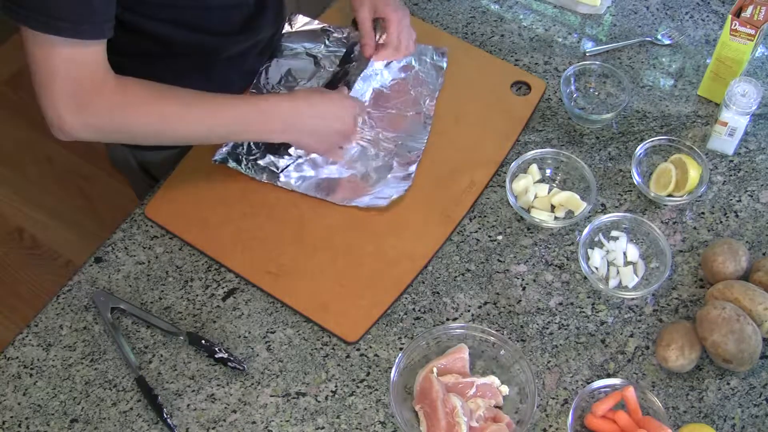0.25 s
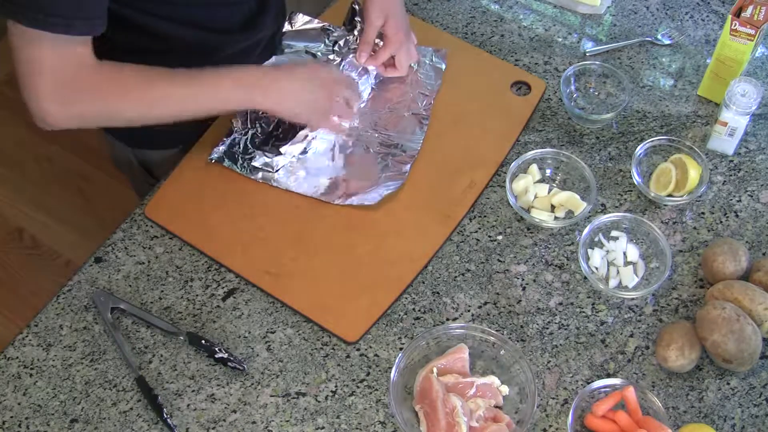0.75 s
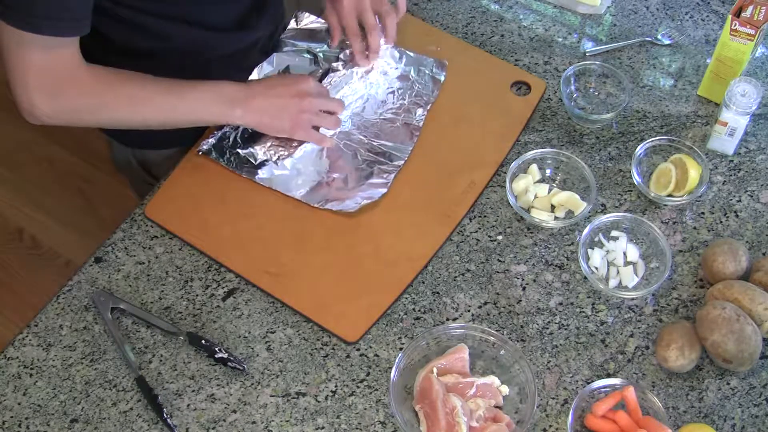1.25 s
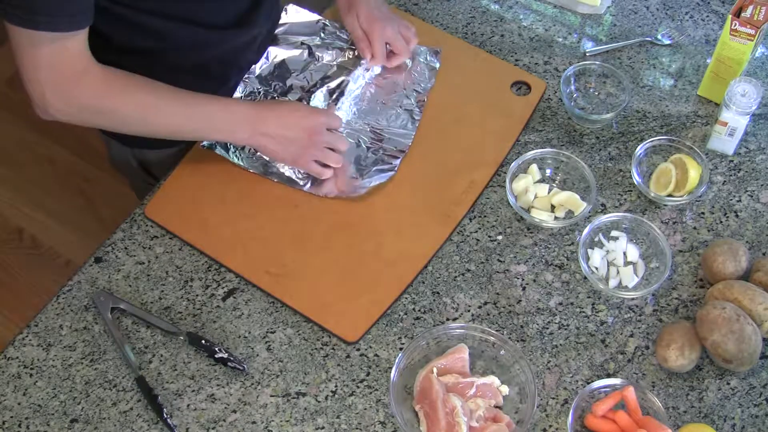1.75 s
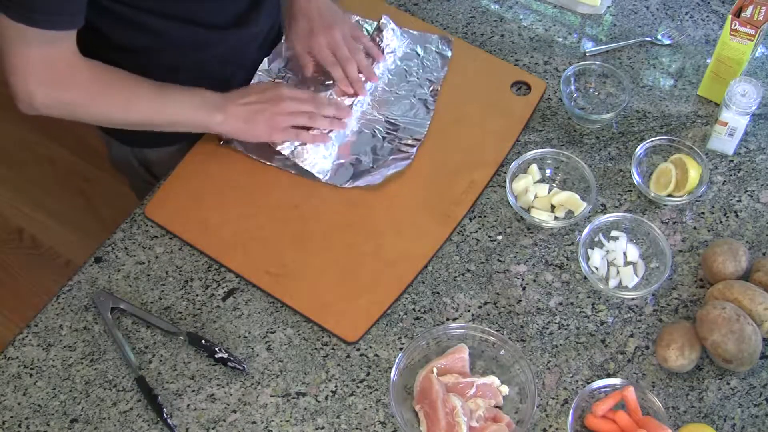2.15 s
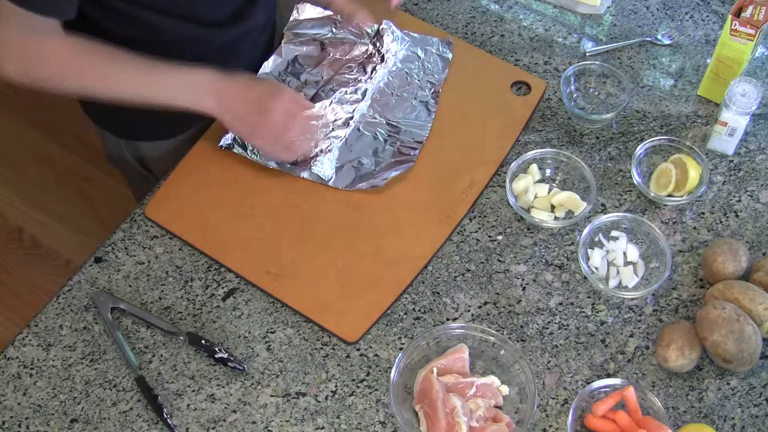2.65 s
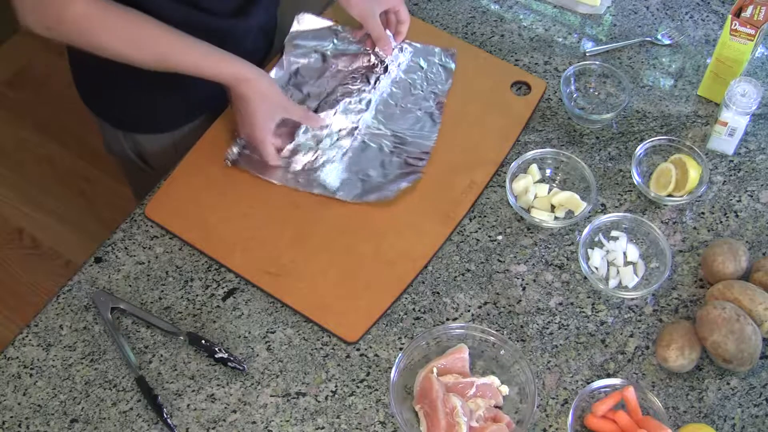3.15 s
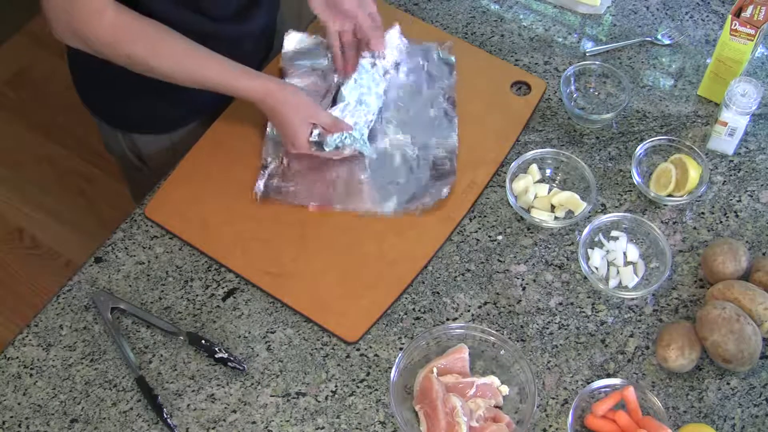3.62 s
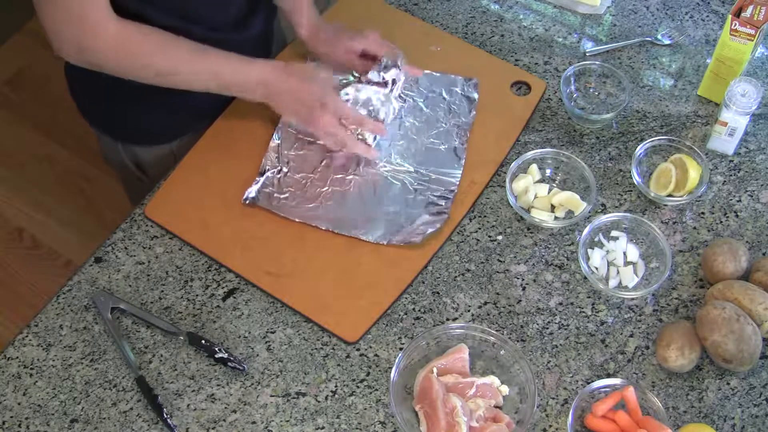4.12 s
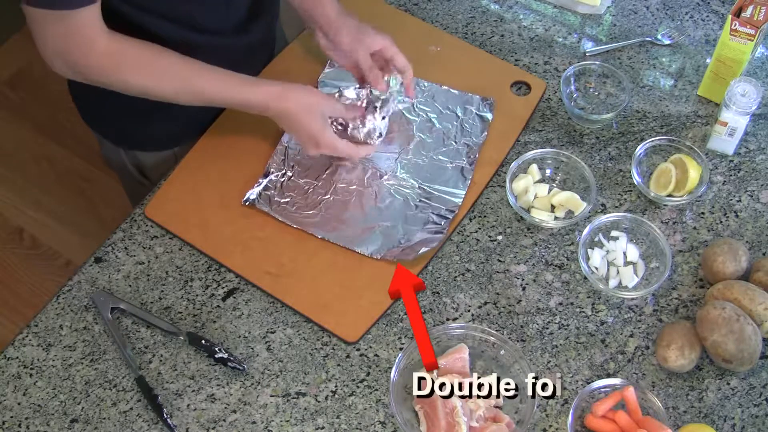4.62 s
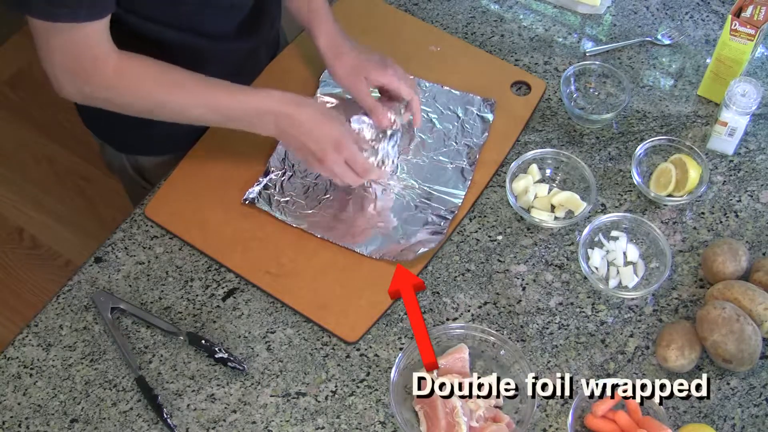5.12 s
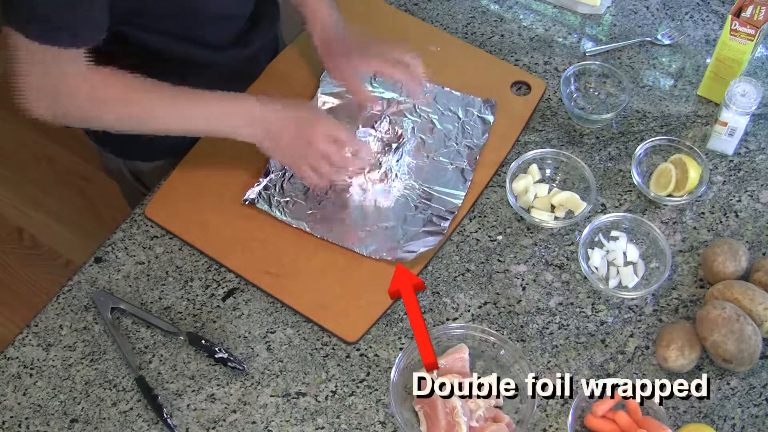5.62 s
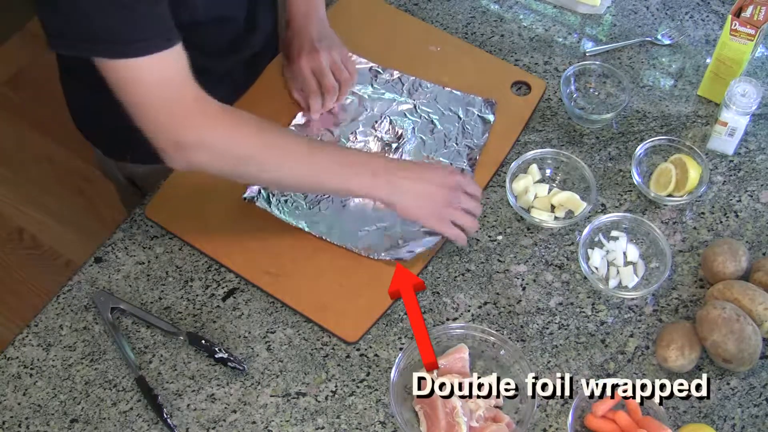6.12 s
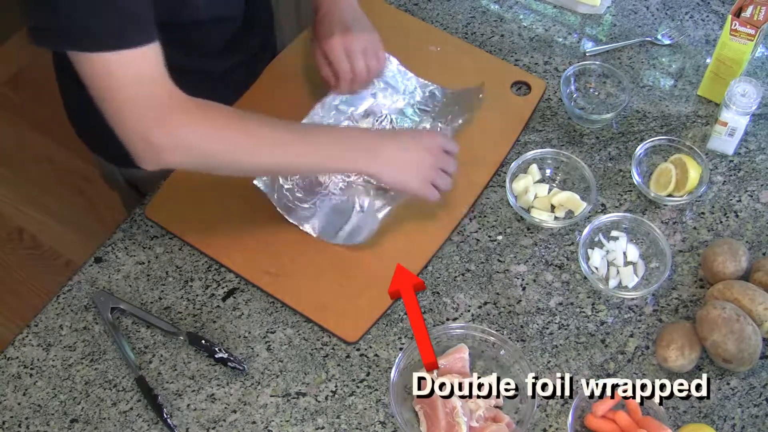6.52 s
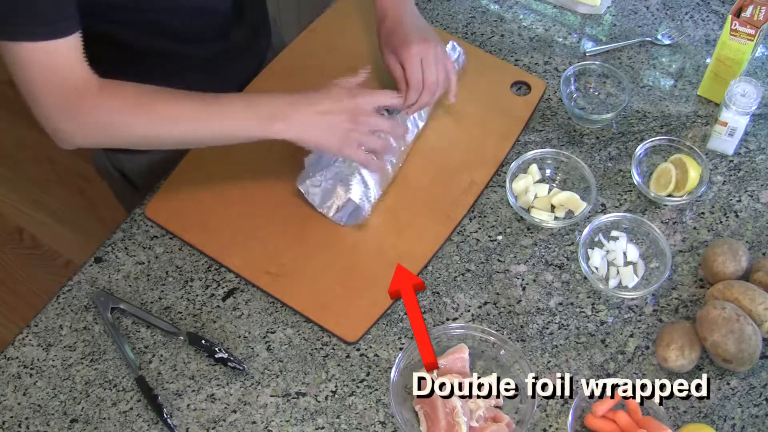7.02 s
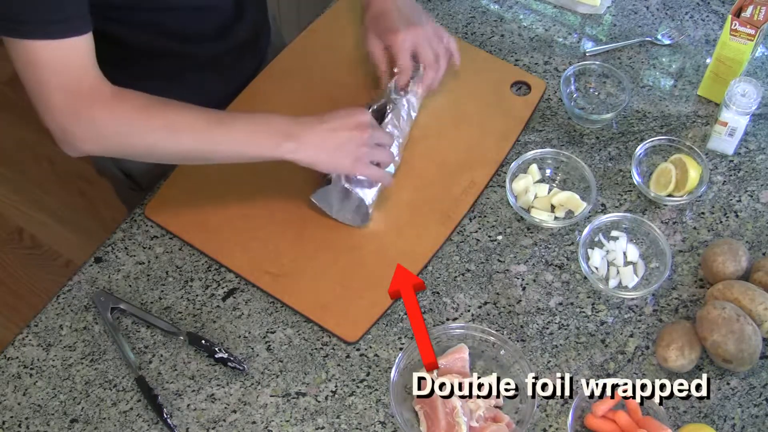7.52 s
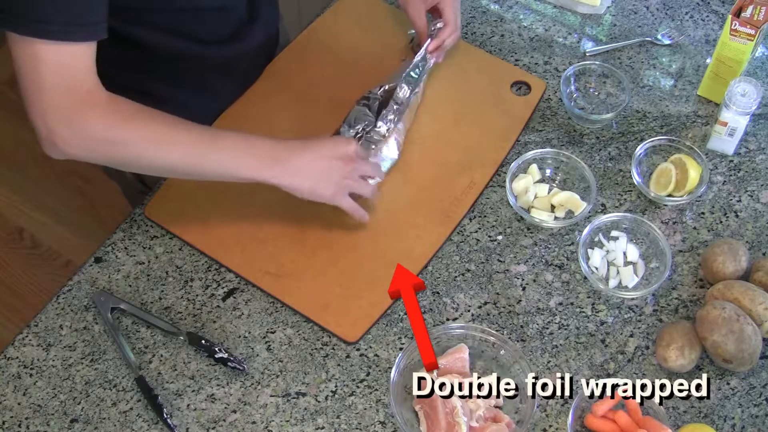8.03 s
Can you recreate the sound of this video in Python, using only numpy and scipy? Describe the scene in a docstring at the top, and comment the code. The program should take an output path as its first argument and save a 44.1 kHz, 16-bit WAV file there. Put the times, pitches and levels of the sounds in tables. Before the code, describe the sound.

Bright metallic foil crinkles, snaps and pops under busy fingers in a kitchen, falls almost silent briefly, then crackles again with hollow thumps.

```python
"""In a kitchen, hands fold and press aluminium foil around food on a cutting board, pausing briefly.
Creases yield in showers of tiny noise-burst cracks, with louder snaps and dense crunches among them.
Wider panels buckle as damped low swings, hollow and booming once the foil is folded over, and bump the board.
Taut facets ring, a sliding fingertip sings, and a short diffuse room tail follows over hiss and a faint whine."""
import sys
import numpy as np
from scipy import signal
from scipy.fft import rfft, irfft, next_fast_len
from scipy.io import wavfile
from scipy.ndimage import uniform_filter1d

SR = 44100
rng = np.random.default_rng(int(sys.argv[2]) if len(sys.argv) > 2 else 0)


def generate_wav(sig):
    """Save sig (samples, or channels by samples) to the path in sys.argv[1] as 16-bit PCM at SR."""
    pcm = np.round(np.clip(np.atleast_2d(sig).T, -1, 1) * 32767).astype(np.int16)
    wavfile.write(sys.argv[1], SR, pcm)


N = 364707

# All levels are relative: each source function sets its own reference.
# Fingers press or fold the sheet: (start [s], length [s], crease level [dB], panel level [dB])
PRESSES = [(0, 0.06, -46.5, -51.5), (0.039, 0.099, -42.5, -55), (0.227, 0.027, -43, -55),
           (0.284, 0.083, -44.5, -53.5), (0.394, 0.12, -46.5, -57), (0.586, 0.082, -43.5, -53.0),
           (0.673, 0.04, -48.5, -54.5), (0.786, 0.068, -53, -59), (0.909, 0.13, -48, -47),
           (1.035, 0.095, -44.5, -48), (1.157, 0.091, -47.5, -53), (1.326, 0.091, -45.5, -50.5),
           (1.447, 0.15, -43.5, -48.5), (1.619, 0.18, -49, -49.5), (1.849, 0.11, -46.5, -44.5),
           (2.024, 0.17, -56, -54.5), (2.2, 0.12, -38.0, -41.5), (2.329, 0.073, -45, -50),
           (2.52, 0.1, -48.5, -57), (2.865, 0.056, -48.5, -76), (2.922, 0.063, -43.5, -66),
           (3.131, 0.17, -52, -53.0), (3.347, 0.14, -54.5, -55.5), (3.492, 0.1, -48.5, -61),
           (3.644, 0.17, -50, -65), (3.93, 0.05, -57, -63), (4.029, 0.11, -50.5, -55),
           (4.149, 0.13, -47.5, -77), (4.345, 0.065, -50.5, -58), (4.43, 0.031, -42.5, -48),
           (4.5, 0.0086, -47, -52), (4.536, 0.07, -45.5, -50), (4.632, 0.11, -41.5, -48.5),
           (4.764, 0.06, -47.5, -70), (4.955, 0.13, -53.0, -68), (5.104, 0.082, -56.0, -78),
           (5.28, 0.023, -61, -68), (5.422, 0.1, -60.5, -73.0), (5.558, 0.029, -54.5, -63),
           (6.081, 0.02, -59, -74.5), (6.193, 0.061, -62.5, -84), (6.359, 0.061, -41.0, -59),
           (6.437, 0.062, -45.5, -55), (6.555, 0.049, -48.5, -54.5), (6.617, 0.1, -46.0, -53),
           (6.806, 0.066, -45.5, -50), (6.88, 0.17, -44, -49.5), (7.09, 0.014, -39.5, -52),
           (7.141, 0.013, -43, -50), (7.205, 0.049, -42, -45), (7.288, 0.1, -41.5, -43.5),
           (7.4, 0.14, -52, -55.5), (7.607, 0.177, -44.5, -45.5), (7.809, 0.084, -40.5, -46.5),
           (7.916, 0.16, -41.5, -47.5), (8.126, 0.04, -42, -56), (8.245, 0.044, -35, -43.5)]
# Rustle under resting hands: (time [s], level [dB])
GRIP = [(0, -52), (.7, -55.5), (.87, -58.5), (1.1, -58), (1.3, -55.5), (1.5, -45.5), (2.15, -48),
        (2.46, -58), (3.2, -51), (3.9, -56.5), (4.7, -56), (4.9, -65.5), (5.25, -69.5), (6.31, -70.5),
        (6.36, -56.5), (7.3, -54), (7.55, -51), (8.2, -45)]
# The hands let go: (start [s], end [s])
PAUSES = [(2.68, 2.85), (5.62, 6.05)]
# Shape of the sheet as it is wrapped: (time [s], hollow level [dB], crease treble level [dB])
SHAPE = [(0, -1.5, -7), (.8, -1.5, -8.5), (1.1, -10, -4.5), (1.35, -3, -10.5), (1.8, -8, -8.5),
         (2.35, -20, -6.5), (2.9, -3, -7), (3.3, -22, -3.5), (4.0, -19, -7.5), (4.25, -6, -3.5),
         (4.6, -15, -6), (5.3, -9, -2.5), (6.5, -10, -5.5), (6.72, -4.5, -9), (7.3, -1, -6.5),
         (8.27, -5.5, -8.5)]
# A fold collapses in a quick run of cracks: (time [s], level [dB])
CRUNCHES = [(0.061, -30), (0.302, -31), (0.8014, -33), (0.9722, -39), (1.635, -26.5), (1.916, -23),
            (2.2117, -28), (2.623, -28.5), (2.853, -29.5), (3.135, -38), (3.712, -33), (4.0414, -32.5),
            (4.16, -31.5), (4.358, -29.5), (4.4433, -32), (4.5023, -24.5), (4.6363, -31), (5.3796, -46.5),
            (5.4164, -52), (5.5808, -42), (6.0478, -51), (6.088, -37), (6.372, -33), (6.3977, -28.5),
            (6.5577, -32.5), (7.011, -27), (7.0947, -33.5), (7.147, -27.5), (7.3, -41), (7.81, -31),
            (8.2288, -27.5)]
# Crackle spectrum, tiny facets radiate little bass: (frequency [Hz], level [dB])
CRACKLE_SPECTRUM = [(100, -46), (400, -17.5), (1200, -8.5), (1700, -3), (2200, -6), (3000, -0.5),
                    (3900, -3), (5200, -0.5), (7000, -4.5), (9700, -4.5), (11300, -7), (13200, -7),
                    (15500, -13), (17000, -39)]
# Registers from large to small facets: (low edge [Hz], high edge [Hz])
FACET_BANDS = [(900, 2300), (2300, 4000), (4000, 6500), (6500, 10500), (10500, 17000)]
# Single creases snap through: (time [s], level [dB], facet resonance [Hz])
SNAPS = [(0.0423, -24.5, 3640), (0.228, -35, 7420), (0.241, -32, 3040), (0.299, -26, 4300),
         (0.4284, -25.5, 5550), (0.443, -28.5, 6630), (0.462, -35, 6000), (0.5885, -28, 6100),
         (0.6, -30, 5200), (0.6112, -30, 4640), (0.7277, -28.5, 2760), (0.973, -28.5, 4200),
         (0.9807, -28, 3900), (1.055, -27.5, 5200), (1.087, -23, 3250), (1.2047, -30, 5640),
         (1.4618, -28, 9200), (1.5029, -24, 3020), (1.655, -26, 4850), (1.6747, -24.5, 3500),
         (1.7452, -29, 4560), (1.9267, -22, 4650), (1.962, -25.5, 5210), (2.149, -32.5, 3870),
         (2.2134, -29, 4880), (2.2484, -22, 6070), (2.36, -27, 3030), (2.394, -25.5, 3450),
         (2.4606, -37, 9170), (2.5668, -36, 7200), (2.9375, -31, 5080), (3.029, -37, 5700),
         (3.1906, -32, 5880), (3.509, -28.5, 7800), (3.576, -32, 9000), (3.859, -33, 7440),
         (3.9395, -34, 6940), (3.947, -31.5, 6500), (3.9862, -27, 3100), (4.0468, -31.5, 5100),
         (4.0888, -27, 5300), (4.098, -26, 4260), (4.1604, -31, 6400), (4.247, -26.5, 5530),
         (4.2566, -30.5, 4500), (4.2644, -32, 5580), (4.431, -29, 4530), (4.5438, -25, 3180),
         (4.58, -27, 4870), (4.6014, -25.5, 5300), (4.7468, -23, 4800), (4.8038, -24, 5360),
         (4.8309, -23.5, 6160), (4.8445, -29, 5860), (4.8996, -40, 8190), (4.995, -35.5, 4630),
         (5.1533, -38, 4860), (5.178, -42, 4580), (5.4869, -44, 4460), (5.5647, -41, 4600),
         (6.2744, -46, 11300), (6.2875, -40, 8040), (6.3752, -35, 5580), (6.4766, -28.5, 4000),
         (6.6346, -28.5, 4800), (6.699, -27.5, 11200), (6.811, -30, 2920), (6.834, -30.5, 10300),
         (6.8907, -25.5, 3860), (6.932, -25, 3340), (6.972, -30, 3570), (7.3674, -20.5, 2690),
         (7.7803, -24, 3770), (7.9694, -35, 2800), (8.1338, -19, 4780), (8.1431, -25, 3050),
         (8.243, -31, 5110), (8.255, -24.5, 5960), (8.2674, -23, 5460)]
# Snap spectrum: (frequency [Hz], level [dB])
SNAP_SPECTRUM = [(100, -41), (500, -10), (2000, -2.5), (4500, 1.0), (12000, 0.0), (16000, -6), (19000, -20)]
# Taut facets ring on briefly: (time [s], level [dB], pitch [Hz])
PINGS = [(0.804, -45.5, 2600), (0.805, -45, 4500), (1.704, -35.5, 1310), (2.361, -37, 1016),
         (4.255, -45.5, 1630), (4.476, -41.5, 2970), (4.822, -39, 6720), (4.837, -49, 7200)]
# Small-panel spectrum: (frequency [Hz], level [dB])
PANEL_SPECTRUM = [(100, -31.5), (250, -25.5), (450, -8), (750, -2), (1050, 2), (1550, 3.5), (2200, -1),
                  (4000, 10), (10000, -71)]
# Wide-panel spectrum, the hollow of the packet: (frequency [Hz], level [dB])
HOLLOW_SPECTRUM = [(30, -64), (60, -27), (110, -24), (200, -10), (320, -2), (450, 4), (650, 6.5),
                   (900, 9.5), (1800, -32), (5000, -63)]
# Boom of the closed packet: (frequency [Hz], level [dB])
PACKET_SPECTRUM = [(30, -45), (70, -22), (130, -12.5), (190, -3), (290, 1), (400, -6), (1000, -20.5)]
# Wide panels flip over: (time [s], level [dB], pitch [Hz])
BUCKLES = [(0.301, -29, 794), (0.365, -31.5, 1030), (0.413, -30, 990), (0.917, -36, 990),
           (0.971, -25.5, 726), (1.054, -25.5, 960), (1.082, -24, 945), (1.127, -28, 921),
           (1.386, -34, 450), (1.498, -21.5, 1350), (1.528, -27, 1040), (1.705, -27, 1280),
           (2.286, -21.5, 1040), (2.361, -24.5, 1060), (2.968, -30, 1620), (3.247, -25.5, 1620),
           (3.371, -30.5, 1316), (3.66, -27.5, 1010), (3.945, -28.5, 1070), (4.16, -36.5, 520),
           (4.503, -23.5, 1640), (4.809, -30.5, 1140), (5.302, -49, 920), (5.414, -48.5, 420),
           (5.486, -39.5, 1840), (6.696, -30.5, 600), (6.74, -29, 700), (6.81, -34, 476), (6.91, -30, 802),
           (6.971, -29, 668), (7.247, -27, 800), (7.302, -21.5, 724), (7.352, -23, 799), (7.608, -30, 635),
           (7.666, -26, 784), (7.731, -24, 640)]
# The folded packet bumps the cutting board: (time [s], level [dB])
THUDS = [(6.694, -44.5), (6.745, -49.5), (6.812, -48), (6.913, -45), (6.945, -42), (7.228, -39.5),
         (7.301, -44), (7.354, -45), (7.442, -48.5), (7.665, -42), (7.735, -46), (7.97, -47.5), (8.04, -44)]
# Spectrum of the board: (frequency [Hz], level [dB])
BOARD_SPECTRUM = [(30, -45), (70, -23), (170, -10), (340, 0.5), (750, 1), (1100, -15), (3000, -47)]
# A fingertip slides over the flat sheet: (time [s], resonance [Hz], level [dB])
SLIDE = [(6.15, 3240, -95), (6.175, 3140, -73), (6.22, 2860, -75), (6.25, 2650, -73), (6.29, 2220, -79),
         (6.32, 2100, -95)]
# Reverberation of the room: (frequency [Hz], time to fall 60 dB [s])
KITCHEN_T60 = [(200, 0.18), (1000, 0.63), (4000, 0.27), (14000, 0.33)]
# Hiss of the quiet kitchen: (frequency [Hz], level [dB])
HISS_SPECTRUM = [(15, -55), (25, -17), (92, -6.5), (108, -4), (200, -4), (285, -6), (427, -5.5), (463, -17),
                 (531, -5.5), (863, -13), (4740, -23), (10100, -20.5), (16000, -33)]

# A press builds up; creases and panels settle after it
ATTACK_S, CREASE_T60_S, PANEL_T60_S = 0.011, 0.083, 0.27
SAG_DB = 1  # the foil yields from the start of a press to its end
LET_GO_DB_PER_S, LET_GO_DB = 300, 17  # how fast and how far the rustle falls in a pause
FOLDED_S = 6.62  # the outer sheet closes over the food
GRIP_PANELS_DB = -7.5  # panels beside creases under a resting grip, before the packet closes
FOLDED_PANELS_DB = 3.5  # the closed packet flexes more readily in a resting grip
CRUNCH_T60_S = 0.1
THUD_ATTACK_S, THUD_T60_S = 0.0027, 0.092  # attack is a time constant
TOP_HZ = 15950  # upper band limit


def creases():
    """Cascade of yielding: cracks follow the fingers, and collapsing folds add sudden dense runs."""
    _, bright_db = curves(SHAPE)
    press_gain = pressing([row[2] for row in PRESSES], CREASE_T60_S)
    effort = np.hypot(grip(), press_gain)

    fine = unit(cracks(rate=1200, spread_db=6, life=.0007))
    clumps = unit(cracks(rate=120, spread_db=4.5, life=.009))
    tinted = facets(rate=500, spread_db=6, cycles=8)
    mixture = fine + amp(6.5) * clumps + amp(3.0) * tinted
    shower = steady(coloured(mixture, CRACKLE_SPECTRUM), size=1500)

    run_gain, t = np.zeros(N), np.arange(SR // 5) / SR
    for s, db in CRUNCHES:
        add(run_gain, s, amp(db - 10.5 - 60 * t / CRUNCH_T60_S))
    dense = facets(rate=2500, spread_db=4, cycles=6)
    runs = run_gain * steady(coloured(dense, CRACKLE_SPECTRUM), size=300)
    crackle = amp(-1.01) * effort * holding() * shower + runs

    # tight creases crack brighter than loose ones
    highpass = signal.butter(2, 8500, "highpass", fs=SR, output="sos")
    treble = signal.sosfiltfilt(highpass, crackle)
    return crackle + (amp(bright_db + 6.5) - 1) * treble


def facets(rate, spread_db, cycles):
    """Size scaling: each register has its own cracks, and small facets die sooner."""
    track = np.zeros(N)
    for lo, hi in FACET_BANDS:
        band = signal.butter(2, [lo, hi], "bandpass", fs=SR, output="sos")
        bursts = unit(cracks(rate, spread_db, life=cycles / np.sqrt(lo * hi)))
        track += signal.sosfilt(band, bursts)
    return unit(track)


def cracks(rate, spread_db, life):
    """Shot noise: random cracks (rate per s) of unequal size decay with time constant life (s)."""
    count = int(rate * N / SR)
    when, strength = rng.random((count, 2)).T
    size = amp(spread_db * -np.log(1 - .97 * strength))
    energy = np.bincount((when * N).astype(int), size ** 2, N)
    # energy decays twice as fast as amplitude
    dying = signal.lfilter([1], [1, -np.exp(-2 / (life * SR))], energy)
    return np.sqrt(dying) * rng.standard_normal(N)


def pressing(levels_db, t60):
    """Load and relaxation: each press builds up fast, sags as the foil yields and dies away."""
    power = np.zeros(N)
    for (s, length, _, _), db in zip(PRESSES, levels_db):
        t = np.arange(int((length + .3) * SR)) / SR
        attack = np.minimum(t / ATTACK_S, 1)
        sag_db = SAG_DB * (np.minimum(t / length, 1) - .5)
        release_db = 60 * np.maximum(t - length, 0) / t60
        gain = attack * amp(db - sag_db - release_db)
        add(power, s - ATTACK_S / 2, gain ** 2)
    return np.sqrt(power)


def grip():
    """Sustained light load: the rustle under resting hands dies away when they let go."""
    t = np.arange(N) / SR
    db, = curves(GRIP)
    for start, end in PAUSES:
        fall_db = np.clip(LET_GO_DB_PER_S * (t - start), 0, LET_GO_DB)
        db = db - fall_db * (t < end)
    return amp(db)


def holding():
    """Stored strain: a fold holds still for a moment, damping the rustle, before it gives way."""
    dip_db, t = np.zeros(N), np.arange(SR // 25) / SR
    for s, _ in CRUNCHES:
        add(dip_db, s - len(t) / SR, -9 * np.exp(-t / 0.0057)[::-1])  # deepest at the crunch
    return amp(dip_db)


def snaps():
    """Snap-through: a broad crack, tinted by the facet beside it, and a shiver through the sheet."""
    track, t = np.zeros(N), np.arange(SR // 30) / SR
    for s, db, hz in SNAPS:
        decay = np.exp(-t / .0009) + .15 * np.exp(-t / .007)  # crack, then shiver
        crack = rng.standard_normal(len(t)) * decay
        facet = signal.lfilter(*signal.iirpeak(hz, 3, fs=SR), crack)
        add(track, s, amp(db - 6.0) * np.tanh(1.28 * crack + 2.26 * facet))
    return coloured(track, SNAP_SPECTRUM)


def panels():
    """Bending of wide panels pops at lower pitch; once folded over, the enclosed air adds a low boom."""
    hollow_db, _ = curves(SHAPE)
    closed = np.clip((np.arange(N) / SR - FOLDED_S) / 0.03, 0, 1)
    resting = amp(GRIP_PANELS_DB + FOLDED_PANELS_DB * closed) * grip()
    press_gain = pressing([row[3] for row in PRESSES], PANEL_T60_S)
    bending = np.hypot(resting, press_gain)

    small = pops(rate=550, hz=1296, spread_db=3.0, size=320)
    wide = pops(rate=380, hz=581, spread_db=4.5, size=640)
    flat = steady(coloured(small, PANEL_SPECTRUM))
    hollow = steady(coloured(wide, HOLLOW_SPECTRUM), size=2600)
    boom = closed * steady(coloured(wide, PACKET_SPECTRUM), size=2600)
    body = hollow + amp(-13.5) * boom
    return bending * (amp(-2.0) * flat + amp(hollow_db + 0.44) * body)


def pops(rate, hz, spread_db, size):
    """Heavy damping: random facets flip, each a short swing within an octave either side of hz."""
    count = int(rate * N / SR)
    when, strength, pitch, side = rng.random((count, 4)).T[:, :, None]
    cycles = hz * 2 ** (2 * pitch - 1) * np.arange(size) / SR
    gain = np.sign(side - .5) * amp(spread_db * -np.log(1 - .98 * strength))
    swings = gain * np.sin(2 * np.pi * cycles) * np.exp(-2 * cycles)
    places = (when * N).astype(int) + np.arange(size)
    return np.bincount(places.ravel(), swings.ravel(), N)[:N]


def buckles():
    """Buckling instability: a panel flips with one hard swing and a short flutter around its pitch."""
    track, t = np.zeros(N), np.arange(SR // 30) / SR
    for s, db, hz in BUCKLES:
        push = 0.5 * rng.standard_normal(len(t)) * np.exp(-t / 0.0059)  # flutter
        push[0] += 1  # the hard swing
        band = signal.butter(2, [hz / 2, hz * 2], "bandpass", fs=SR, output="sos")
        pop = signal.sosfilt(band, push)
        add(track, s, amp(db - 7.5) * pop / np.abs(pop).max())
    return track


def thuds():
    """Inelastic impact: the soft, heavy packet lands on the board with a dull, short bump."""
    gain, t = np.zeros(N), np.arange(SR // 10) / SR
    for s, db in THUDS:
        attack = 1 - np.exp(-t / THUD_ATTACK_S)
        add(gain, s, amp(db - 60 * t / THUD_T60_S) * attack)
    board = steady(coloured(rng.standard_normal(N), BOARD_SPECTRUM), size=400)
    return amp(4) * gain * board


def pings():
    """Modal ringing: a taut facet sounds two close modes that decay exponentially."""
    track, t = np.zeros(N), np.arange(SR // 12) / SR
    for s, db, hz in PINGS:
        second_hz = hz * (1 + 0.042 * rng.standard_normal())
        pair = np.cos(2 * np.pi * hz * t) + .5 * np.cos(2 * np.pi * second_hz * t)
        add(track, s, amp(db) * pair * np.exp(-t / 0.0085))
    return track


def slide():
    """Friction excites a resonance: the rubbed sheet sings faintly, falling as the finger moves."""
    hz, db = curves(SLIDE)
    return amp(db) * narrow(hz, width_hz=300)


def kitchen(x):
    """Reverberation: walls and counter return a diffuse tail whose decay depends on frequency."""
    hz, t, z = signal.stft(rng.standard_normal(SR // 2), SR, nperseg=256)
    decay = amp(-60 * t / along(KITCHEN_T60, hz)[:, None])
    tail = signal.istft(z * decay, SR, nperseg=256)[1]
    tail *= 1 - np.exp(-np.arange(len(tail)) / SR / 0.00053)  # soft onset
    return signal.oaconvolve(x, tail / np.linalg.norm(tail))[:N]


def hiss():
    """Stationary noise: a steady, spectrally shaped hiss lies under the foil."""
    return amp(-73) * unit(coloured(rng.standard_normal(N), HISS_SPECTRUM))


def whine():
    """Narrow-band noise: a faint high tone wavers around a fixed pitch."""
    return amp(-88) * narrow(9900, width_hz=260)


def narrow(hz, width_hz):
    """Modulation shifts slow noise to a steady or moving pitch, giving a narrow band of rms 1."""
    lowpass = signal.butter(2, width_hz / 2, fs=SR, output="sos")
    drift = signal.sosfilt(lowpass, rng.standard_normal(N))
    phase = 2 * np.pi * np.cumsum(hz * np.ones(N)) / SR
    return unit(drift * np.cos(phase))


def coloured(x, *spectra, size=4096):
    """Minimum-phase filtering: x through a causal filter of unit energy with the given spectra."""
    hz = np.fft.rfftfreq(size, 1 / SR)
    level_db = sum(along(points, hz) for points in spectra)
    cepstrum = irfft(np.log(amp(level_db) + 1e-6))
    # folding the cepstrum makes the response causal
    cepstrum[1:size // 2] *= 2
    cepstrum[size // 2 + 1:] = 0
    response = irfft(np.exp(rfft(cepstrum)))
    return signal.oaconvolve(x, response / np.linalg.norm(response))[:N]


def steady(x, size=1800):
    """Level normalisation: rms 1 over each short stretch, so that later gains set the swells."""
    power = uniform_filter1d(uniform_filter1d(x ** 2, size), size)
    return x / np.sqrt(np.abs(power) + 1e-12)


def unit(x):
    """Power normalisation: x at rms 1."""
    return x / np.sqrt(np.mean(x ** 2) + 1e-20)


def amp(db):
    """Logarithmic level: decibels to amplitude gain."""
    return 10 ** (np.asarray(db) / 20)


def along(points, hz):
    """Logarithmic frequency: (Hz, value) points interpolated on a log axis."""
    f, v = np.transpose(points)
    return np.interp(np.log(hz + 1), np.log(f + 1), v)


def curves(rows):
    """Linear interpolation: one value per sample for each column after the time."""
    s, *cols = np.transpose(rows)
    return [np.interp(np.arange(N) / SR, s, c) for c in cols]


def add(track, s, sound):
    """Superposition: mix a sound into the track from time s (s)."""
    start = int(np.clip(round(s * SR), 0, N - 1))
    track[start:start + len(sound)] += sound[:N - start]


def scene():
    """Superposition of the foil, its room reflections and the steady background."""
    foil = creases() + snaps() + holding() * panels() + buckles() + thuds() + pings() + slide()
    return (foil + amp(-10.0) * kitchen(foil) + hiss() + whine())[None]


def record(dry):
    """Band limiting: every component at or above the limit is removed."""
    m = next_fast_len(N + 8192)
    passed = np.fft.rfftfreq(m, 1 / SR) < TOP_HZ
    return irfft(rfft(dry, m) * passed, m)[..., :N]


dry = scene()
out = record(dry)
generate_wav(out)
```